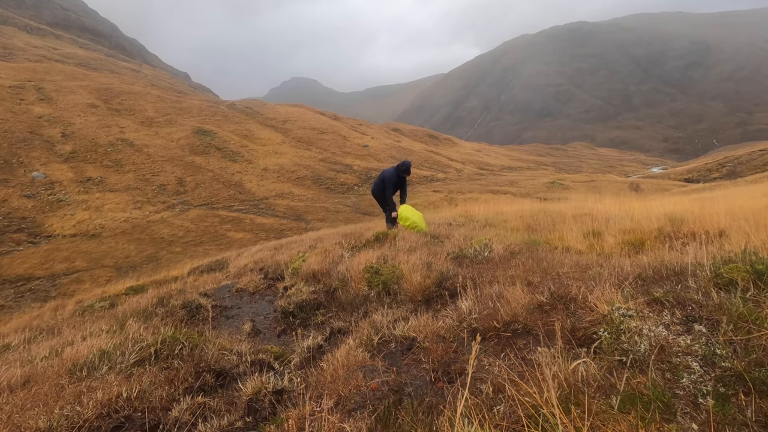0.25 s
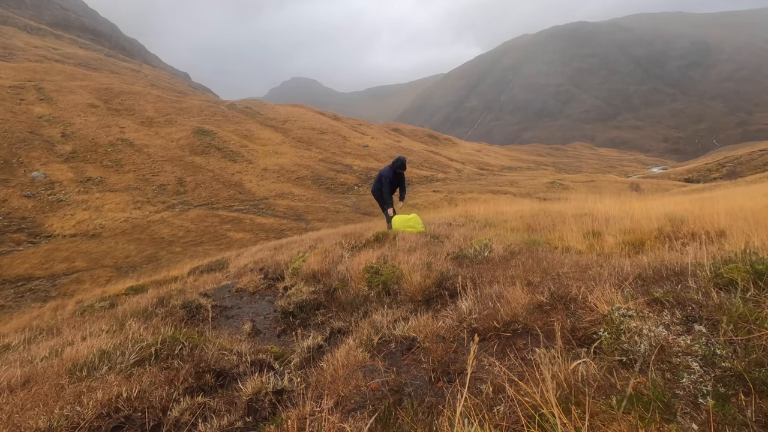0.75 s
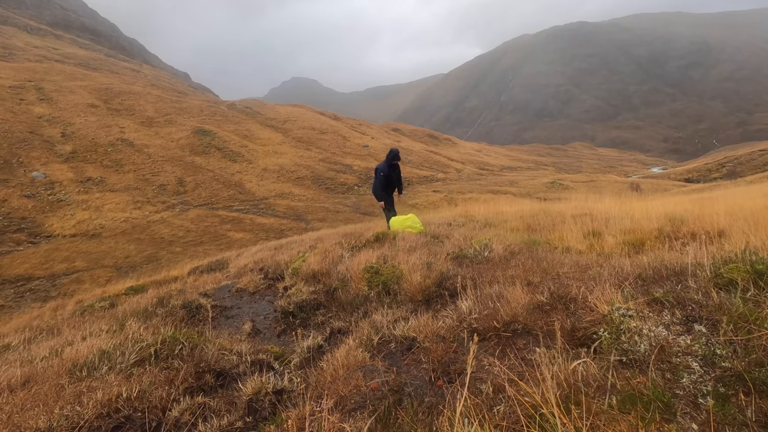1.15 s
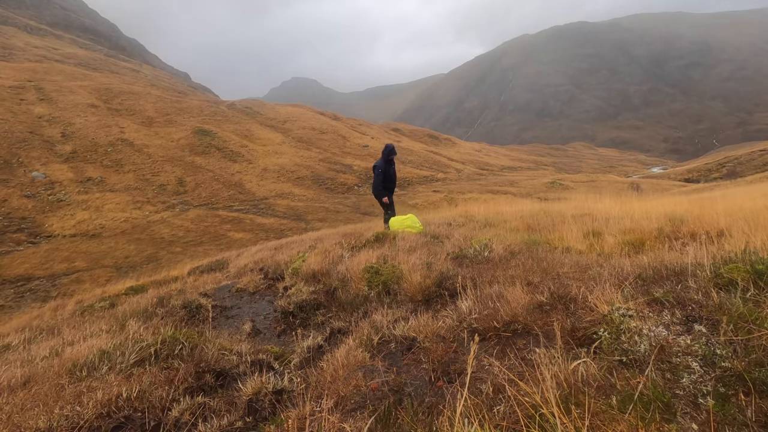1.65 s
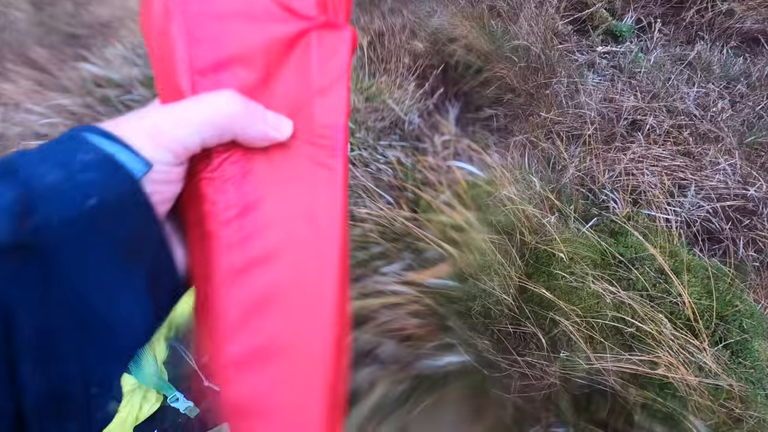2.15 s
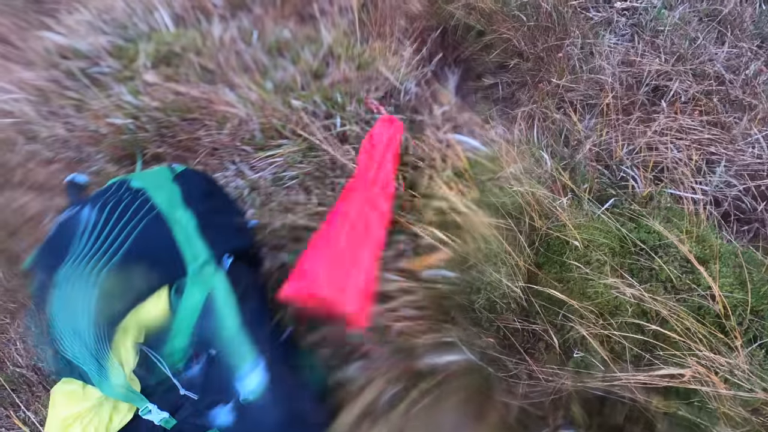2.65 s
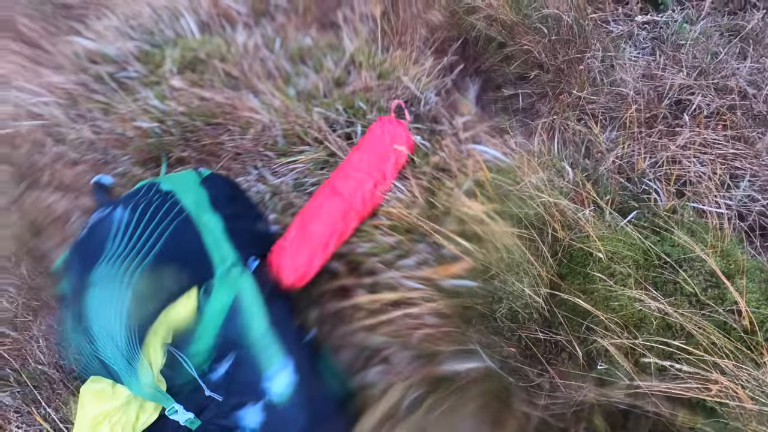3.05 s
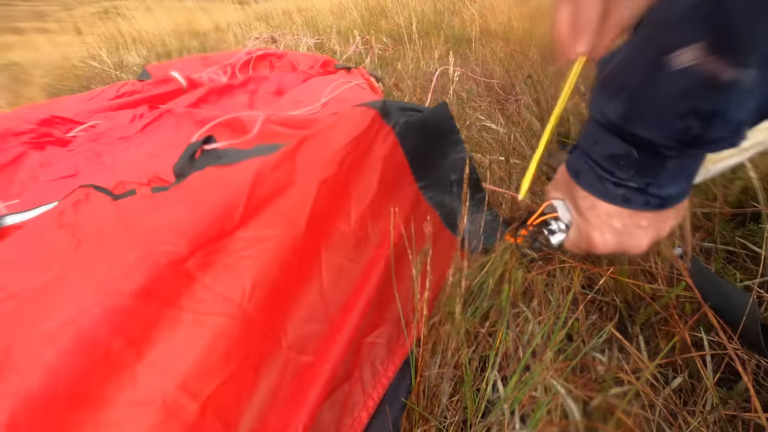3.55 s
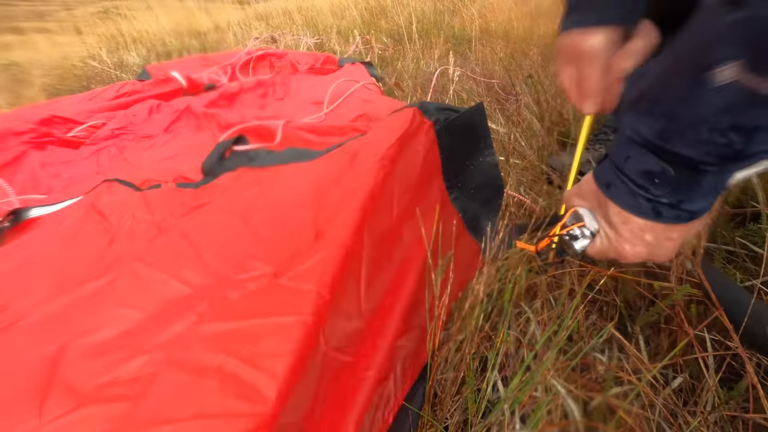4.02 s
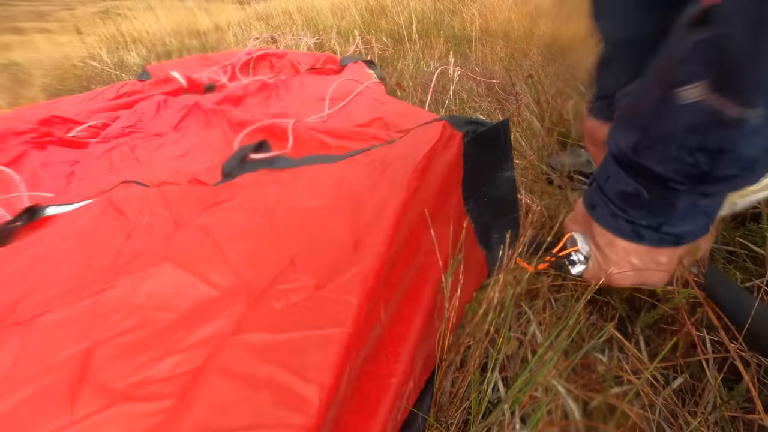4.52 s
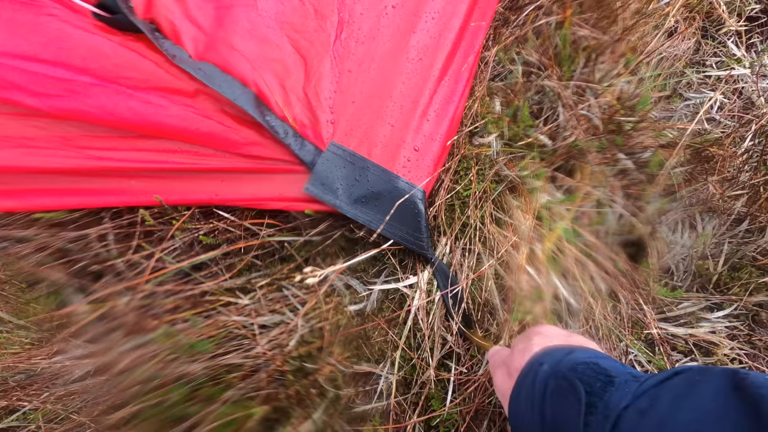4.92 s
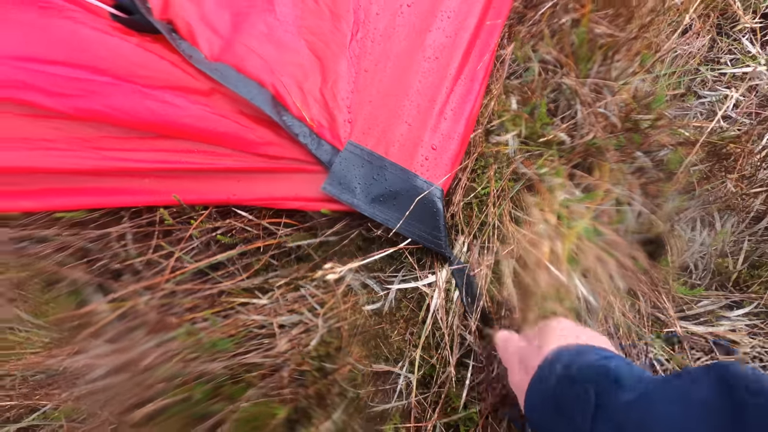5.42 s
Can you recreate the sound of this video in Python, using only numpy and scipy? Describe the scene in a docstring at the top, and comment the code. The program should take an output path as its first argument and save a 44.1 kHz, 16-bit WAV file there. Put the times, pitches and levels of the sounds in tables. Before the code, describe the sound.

Buffeting wind rumble on open grassland, a quick clattering drop of bagged tent poles, then flapping tent cloth crackling until a heavier final gust.

```python
"""Gale on a grassy hillside

Four places are heard in turn, only the third with two separate ports. Banded noise gives the wind's buffeting
and roar, the hiss of grass and the rustle of cloth; windowed sines are the thumps of large eddies.
A bag of metal tent poles is dropped: filtered noise bursts crunch and thud, and resonators ring as the poles.
Tent fabric then rustles and snaps, with short resonant bursts for the snaps and random pops for the folds.
"""
import sys
import numpy as np
from scipy import signal
from scipy.io import wavfile

SR = 44100
rng = np.random.default_rng(int(sys.argv[2]) if len(sys.argv) > 2 else 0)


def boost_factor(decibels):
    """Convert a level in decibels to a linear amplitude factor."""
    exponent = np.asarray(decibels, float) / 20
    return 10 ** exponent


def output_pcm(signal):
    """Save a mono or channel-first signal as 16-bit PCM at the path in sys.argv[1].

    Samples are clipped to [-1, 1] before scaling.
    """
    pcm = np.clip(np.atleast_2d(signal).T, -1, 1) * 32767
    wavfile.write(sys.argv[1], SR, np.round(pcm).astype(np.int16))


N = 250047  # samples

HALVES = np.array([[.5], [-.5]])  # shares a left-minus-right difference between the two channels


def rms_one(x):
    """Normalisation: scale to unit rms."""
    return x / np.sqrt(np.mean(x ** 2) + 1e-20)


def in_time(*tables):
    """Linear interpolation of table columns in time; the first, a level, is silent outside the rows."""
    s, level_db, *others = np.concatenate(tables).T
    t = np.arange(N) / SR
    return [np.interp(t, s, level_db, -120, -120)] + [np.interp(t, s, column) for column in others]


def at_hz(points, hz):
    """Interpolation of a spectrum on a log-frequency axis."""
    table_hz, table_db = np.transpose(points)
    return np.interp(np.log(hz), np.log(table_hz), table_db)


def drift(rate_hz):
    """Low-pass random process: noise at every 20th sample through two equal poles, at unit rms."""
    pole = np.exp(-40 * np.pi * rate_hz / SR)
    noise = rng.standard_normal(N // 20 + 3002)
    slow = signal.lfilter([1], [1, -2 * pole, pole * pole], noise)[3000:]  # settled part
    return np.interp(np.arange(N) / 20, np.arange(len(slow)), rms_one(slow))


def ring(clicks, hz, t60):
    """Impulse response of a damped mode: a unit click starts a decaying sine of nominal height 1."""
    r, w = boost_factor(-60 / (t60 * SR)), 2 * np.pi * hz / SR
    return signal.lfilter([0, np.sin(w)], [1, -2 * r * np.cos(w), r * r], clicks + 1e-18)


def low_pass(x, cut_hz):
    """Second-order Butterworth attenuation of the treble."""
    return signal.sosfilt(signal.butter(2, cut_hz, fs=SR, output="sos"), x)


def burst(hz, t60, width, crack):
    """Resonance excited by a crack and decaying noise, at unit peak; width is bandwidth over frequency."""
    t = np.arange(2205) / SR
    r, w = np.exp(-np.pi * width * hz / SR), 2 * np.pi * hz / SR
    noise = rng.standard_normal(len(t)) * boost_factor(-60 * t / t60)
    noise[0] = crack
    x = signal.lfilter([1, 0, -1], [1, -2 * r * np.cos(w), r * r], noise)
    return x / np.abs(x).max()


def bursts(hits, t60, width, crack):
    """Superposition of bursts at the tabulated times, peaks and centre frequencies."""
    out = np.zeros(N)
    for s, db, hz in hits:
        x, i = boost_factor(db) * burst(hz, t60, width, crack), round(s * SR)
        out[i:i + len(x)] += x
    return out


# interval during which the two ports are heard apart: start t/s, end t/s
APART_S = 3.235, 4.98


def two_ports():
    """Gate of the stereo field: 1 while the ports are heard apart, 0 while they are summed."""
    t = np.arange(N) / SR
    return (t > APART_S[0]) & (t < APART_S[1])


# sound not shared by the ports, against the shared sound: f/Hz, level/dB
PORT_UNSHARED = [(28, -4), (60, -7), (110, -14), (200, -31), (380, -12), (700, -11), (1290, -9), (2380, -8),
                 (4400, -2.5), (8120, 0.5), (15000, 3)]
# left minus right port: f/Hz, level/dB
PORT_LEAN = [(60, 10), (110, -1.5), (200, 1.5), (380, 1.5), (700, 3.5), (1290, 1), (2380, 5.5), (4400, 1),
             (8120, -2.5), (15000, 0)]


def banded(spectrum, patchy_db, patch_rate, tilt_db=0, pulse=1):
    """Subtractive synthesis: enveloped noise in about third-octave bands, each with its own level flicker."""
    low, high = spectrum[1][0], min(spectrum[-2][0], 16000)  # the end rows lie outside the bands
    edges = np.geomspace(low, high, int(np.log2(high / low) / .33) + 2)
    white = pulse * rng.standard_normal((2, 2, N))
    apart, out, power = two_ports(), 0, 0
    for k, (a, b) in enumerate(zip(edges, edges[1:])):
        hz = np.sqrt(a * b)
        band_pass = signal.butter(2, [a, b], "band", fs=SR, output="sos")
        shared, unshared = signal.sosfilt(band_pass, white[k % 2])  # neighbours use different noise
        spectrum_db = at_hz(spectrum, hz)
        octaves = np.log2(hz / np.sqrt(low * high))
        gain = boost_factor(spectrum_db + patchy_db * drift(patch_rate) + tilt_db * octaves)
        lean = np.where(apart, boost_factor(at_hz(PORT_LEAN, hz) * HALVES), 1)
        difference = apart * boost_factor(at_hz(PORT_UNSHARED, hz)) * unshared * [[1], [-1]]
        out = out + gain * lean * (shared + difference)
        power += (b - a) * boost_factor(2 * spectrum_db)
    return out / np.sqrt(power * 2 / SR * np.mean(np.square(pulse)))  # nominal unit rms, untilted


def creases(per_s, spread_db, t60, smooth):
    """Shot-noise envelope: creases let go as sudden rises that die fast, over a smooth rubbing share."""
    sizes = boost_factor(spread_db * np.minimum(rng.exponential(1, N), 5))
    born = rng.random(N) < per_s * boost_factor(3.0 * drift(12.0)) / SR
    decays = signal.lfilter([1], [1, -boost_factor(-60 / (t60 * SR))], sizes * born + 1e-18)
    return smooth + rms_one(decays)


def crinkle(per_s, low_hz, high_hz, cycles, fall_db):
    """Random modal excitation: small folds pop, each ringing a few cycles at its own pitch and side."""
    sizes = boost_factor(4 * np.minimum(rng.exponential(1, N), 4)) * rng.choice([-1, 1], N)
    born = rng.random(N) < per_s * boost_factor(3.0 * drift(10.0)) / SR
    placed = sizes * born * boost_factor(two_ports() * rng.normal(2.3, 2.5, N) * HALVES)
    pitches, dealt = np.geomspace(low_hz, high_hz, 12), rng.integers(0, 12, N)
    pops = 0
    for k, hz in enumerate(pitches):
        fall = boost_factor(-fall_db * np.log2(hz / low_hz))  # fall_db per octave
        pops = pops + fall * ring(placed * (dealt == k), hz, cycles / hz)
    high_pass = signal.butter(2, low_hz / 2, "high", fs=SR, output="sos")
    return rms_one(signal.sosfilt(high_pass, pops))


# wind before its random drift: t/s, buffeting level/dB, roar level/dB
WIND_LEVELS = [(0.0, -32.5, -32), (0.4, -35, -33), (0.95, -41, -35), (1.3, -40, -33), (1.92, -34, -33),
               (1.98, -43, -34), (2.165, -40, -36), (2.185, -35, -32), (2.43, -43, -30), (2.66, -43, -33.5),
               (3.0, -36, -34.5), (3.23, -37, -34), (4.0, -30, -33.5), (4.1, -36, -35.5),
               (4.45, -38.5, -34), (4.96, -32, -33.5), (4.99, -25, -29), (5.3, -32, -32),
               (5.52, -26.5, -31), (5.67, -31.5, -34.5)]
# relative spectral density of the buffeting: f/Hz, level/dB per Hz
BUFFET_SPECTRUM = [(11, -30), (18, -1.5), (41, 2), (66, 1), (110, -9.5), (140, -27), (240, -120)]
# relative spectral density of the roar before tilt: f/Hz, level/dB per Hz
ROAR_SPECTRUM = [(47, -30), (80, 0.5), (183, -3.5), (258, -8), (388, -13.5), (519, -18.5), (594, -30),
                 (700, -17.5), (910, -32), (1540, -120)]
# colour of the roar at each place: start t/s, brightening/dB per octave
ROAR_COLOUR = [(0, 1), (2.175, -1), (3.235, -2), (4.98, 2)]


def wind_on_ports():
    """Turbulent pressure fluctuation: large eddies buffet slowly below, small ones roar above."""
    buffet_db, roar_db = in_time(WIND_LEVELS)
    starts, tilts = np.transpose(ROAR_COLOUR)
    tilt_db = tilts[np.searchsorted(starts, np.arange(N) / SR, "right") - 1]
    buffet = banded(BUFFET_SPECTRUM, patchy_db=1.0, patch_rate=10.0)
    roar = banded(ROAR_SPECTRUM, patchy_db=1.0, patch_rate=13.4, tilt_db=tilt_db)
    return boost_factor(buffet_db + 1.23 * drift(4.4)) * buffet + boost_factor(roar_db) * roar


# grass hiss: t/s, level/dB, brightening/dB per octave
GRASS_LEVELS = [(0.0, -42.5, 1.5), (1.41, -45, 1), (2.11, -43.5, 1), (2.41, -40.5, -2), (2.68, -50, -5),
                (2.84, -42, 2.5), (3.09, -49, -2.5), (3.25, -47, -1)]
# relative spectral density of the hiss before tilt: f/Hz, level/dB per Hz
GRASS_SPECTRUM = [(290, -30), (500, -3), (602, -10), (836, -10.5), (911, -6.5), (1780, -9.5), (2550, -15.5),
                  (2820, -16), (4080, -19), (7340, -38.5), (8460, -35.5), (12800, -55), (15200, -72)]


def grass():
    """Incoherent summation: many far blades rubbing make a smooth hiss."""
    level_db, tilt_db = in_time(GRASS_LEVELS)
    return boost_factor(level_db) * banded(GRASS_SPECTRUM, patchy_db=0.58, patch_rate=10.0, tilt_db=tilt_db)


# big eddies, before the lean between ports: centre t/s, swell peak level/dB, f/Hz
EDDIES = [(0.039, -21.5, 45.4), (0.169, -22, 50), (0.78, -25, 45), (1.11, -27, 40), (1.259, -21, 45),
          (1.561, -18.5, 45), (1.87, -25, 33), (2.35, -23, 55), (3.12, -22, 35), (3.295, -18, 45),
          (3.81, -21, 30), (3.99, -22.5, 50), (4.19, -25.5, 35), (4.571, -20.5, 28), (5.02, -14.5, 35),
          (5.182, -11, 38), (5.26, -19, 23.05), (5.401, -16.5, 35), (5.54, -18.5, 62)]


def thumps():
    """Gaussian-windowed oscillation: each big eddy pushes and pulls for about one cycle."""
    width_cycles, left_db, lag_rad = 0.3, 6.0, 0.9  # lean and phase lag act while the ports are apart
    t, out, apart = np.arange(N) / SR, np.zeros((2, N)), two_ports()
    phases = rng.uniform(0, 2 * np.pi, len(EDDIES))
    for (s, db, hz), phase in zip(EDDIES, phases):
        near = slice(max(round((s - 2 / hz) * SR), 0), round((s + 2 / hz) * SR))
        cycles = (t[near] - s) * hz
        ports = apart[near] * HALVES
        swell = boost_factor(db + left_db * ports) * np.exp(-.5 * (cycles / width_cycles) ** 2)
        out[:, near] += swell * np.sin(2 * np.pi * cycles + phase + lag_rad * ports)
    return out


# three moves of the bag, one list each, before the layer gains: t/s, relative rustle level/dB
BAG_MOVES = [
    [(2.2, -55), (2.31, -39), (2.32, -32), (2.39, -40), (2.398, -28), (2.496, -57), (2.55, -45)],
    [(2.56, -45), (2.602, -28), (2.62, -11), (2.678, -19), (2.712, -33), (2.768, -30), (2.784, -37),
     (2.86, -45)],
    [(2.87, -47), (2.956, -15.5), (3.006, -30), (3.016, -22.5), (3.042, -32.5), (3.136, -45), (3.144, -58),
     (3.2, -52)],
]
# relative spectral density of bag cloth before tilt: f/Hz, level/dB per Hz
BAG_SPECTRUM = [(350, -45), (600, -8), (1090, -4.5), (1380, -8), (1690, -3.5), (3160, -5), (3570, 0.5),
                (4820, 0), (8090, -12.5), (9660, -23), (12200, -13.5), (15600, -45)]


def bag_rustle():
    """Stick-slip friction: bag cloth rustles as many small, crisp creases and pops."""
    level_db, = in_time(*BAG_MOVES)
    envelope = creases(900., 3.3, 0.0082, smooth=0.79)
    rub = banded(BAG_SPECTRUM, patchy_db=2.9, patch_rate=39.0, tilt_db=0.3, pulse=envelope)
    folds = crinkle(600., low_hz=2210, high_hz=8400, cycles=7.3, fall_db=1.5)
    return boost_factor(level_db) * (boost_factor(-8) * rub + boost_factor(-14.0) * folds)


# bag cloth crunching under the poles, before softening: t/s, peak level/dB, centre f/Hz
CRUNCHES = [(2.2757, -27, 2490), (2.3176, -34, 3820), (2.3983, -20, 3610), (2.4044, -26, 2440),
            (2.435, -33, 2030), (2.613, -22, 3590), (2.6227, -12, 4680), (2.6345, -8, 4870),
            (2.649, -10, 5540), (2.67, -13, 4530), (2.7024, -25, 4650), (2.7436, -29, 3560),
            (2.7656, -32, 4700), (2.807, -27, 2450), (2.8917, -24.5, 2480), (2.907, -28, 4700),
            (2.9507, -4.5, 4800), (2.9537, -18, 3590), (2.9684, -9.5, 3730), (2.9844, -16, 4230),
            (3.017, -14.5, 4190), (3.0265, -18.5, 3540), (3.057, -33, 5120), (3.0724, -31, 5060),
            (3.101, -22.5, 4730), (3.1195, -28, 2500), (3.131, -37, 4600)]


def bag_crunch():
    """Impulsive excitation: each shift of the poles crushes the cloth in a short, soft burst."""
    return low_pass(bursts(CRUNCHES, t60=0.03, width=0.93, crack=4.0), 9000)


# pole on pole: t/s, level/dB, f/Hz of the mode struck hardest, fall-off away from it/dB per octave
POLE_HITS = [(2.316, -31.5, 3600, 18), (2.398, -32, 3600, 10), (2.613, -30, 3600, 12),
             (2.62, -23, 8150, 14), (2.624, -25, 1110, 25), (2.670, -28, 2444, 12), (2.702, -35, 4690, 14),
             (2.742, -30, 3600, 21), (2.751, -33, 2444, 27), (2.767, -36, 4690, 17), (2.805, -41, 7850, 4),
             (2.909, -33, 4690, 20), (2.954, -21, 3600, 16), (2.968, -28, 3600, 8), (3.016, -31, 3600, 9),
             (3.061, -35, 4690, 18), (3.132, -36.5, 4690, 22)]
# modes of the poles: f/Hz, relative level/dB, t60/s
MODES = [(1110, 3.5, 0.074), (2444, 0, 0.087), (3600, 3.5, 0.044), (4690, 3, 0.026), (6570, -22, .05),
         (7850, -2, 0.058), (8150, 1.5, 0.052), (8700, -13, .06), (10800, -8, .07)]


def pole_clinks():
    """Modal synthesis: each clink rings the pole modes, favouring those near its contact colour."""
    s, level_db, centre_hz, fall_db = np.transpose(POLE_HITS)
    chance_db = rng.normal(0, 3.6, (len(s), len(MODES)))
    out = np.zeros(N)
    for k, (hz, mode_db, t60) in enumerate(MODES):
        clicks = np.zeros(N)
        far_db = fall_db * np.abs(np.log2(hz / centre_hz))
        clicks[np.round(s * SR).astype(int)] = boost_factor(level_db + mode_db + chance_db[:, k] - far_db)
        out += ring(clicks, hz, t60)
    return out


# the bag bumps the ground, before softening: t/s, peak level/dB, centre f/Hz
GROUND_HITS = [(2.327, -27, 700), (2.618, -19, 550), (2.951, -26, 700)]


def bag_thuds():
    """Damped impact: the loaded bag meets the turf with a dull, broad push."""
    return low_pass(bursts(GROUND_HITS, t60=0.07, width=1.3, crack=2.5), 1600)


# flapping of the tent, before drift and layer gains: t/s, relative rustle level/dB
TENT_FLAPPING = [(3.24, -40.5), (3.32, -36), (3.66, -36), (3.76, -42.5), (3.8, -35), (3.92, -40.5),
                 (3.95, -38.5), (4.03, -43), (4.08, -40.5), (4.47, -40), (4.6, -43), (4.63, -40),
                 (4.975, -38.5), (5.185, -43), (5.285, -39), (5.45, -37.5), (5.58, -42.5), (5.67, -42)]
# relative spectral density of tent cloth before tilt: f/Hz, level/dB per Hz
TENT_SPECTRUM = [(290, -36), (500, -6), (569, -12), (612, 2), (851, -3), (955, 3), (2140, -1.5),
                 (3020, -4.5), (7690, -19), (12400, -31), (15600, -50)]


def tent_rustle():
    """Stick-slip friction: flapping tent cloth rubs more smoothly, with sparser creases and pops."""
    level_db, = in_time(TENT_FLAPPING)
    envelope = creases(200., 2.2, 0.0021, smooth=2.2)
    rub = banded(TENT_SPECTRUM, patchy_db=1.55, patch_rate=26.0, tilt_db=0.2, pulse=envelope)
    folds = crinkle(250., low_hz=1120, high_hz=7500, cycles=6.5, fall_db=1.0)
    return boost_factor(level_db + 1.45 * drift(7.0)) * (boost_factor(-2.5) * rub + boost_factor(-7.5) * folds)


def flicks():
    """Random point process: small snaps at chance moments, their level following the flapping."""
    per_s, above_db, spread_db = 60., 9, 4.0  # levels over the tabulated flapping
    low_hz, high_hz, side_db = 1700, 5000, 6.5
    flap_db, = in_time(TENT_FLAPPING)
    start, span = TENT_FLAPPING[0][0], TENT_FLAPPING[-1][0] - TENT_FLAPPING[0][0]
    when, loud, pitch, side = rng.random((int(per_s * span), 4)).T
    i = ((start + span * when) * SR).astype(int).clip(0, N - 1)
    db = flap_db[i] + above_db + spread_db * (2 * loud - 1)
    hz = low_hz * (high_hz / low_hz) ** pitch
    # one-sided lean, in the same columns as the snaps
    return np.transpose([i / SR, db, hz, 2 * side * side_db * two_ports()[i]])


# loudest tent snaps, before tick and softening: t/s, peak level/dB, centre f/Hz, left minus right level/dB
LOUD_SNAPS = [(3.2932, -22, 1780, -1), (3.334, -19, 1550, -4), (3.3995, -25, 1510, 2.5),
              (3.4229, -17, 2390, 2.0), (3.4685, -25, 1770, 1), (3.4826, -16, 1820, 1),
              (3.5427, -23, 2080, 0), (3.628, -19, 1230, 0), (3.6657, -18, 1220, 1),
              (3.7806, -24, 2380, 3.0), (3.794, -26, 1310, 1), (3.815, -19, 3640, 3.5),
              (3.8295, -17.5, 1730, 3.5), (3.8544, -17.5, 2000, 5), (3.885, -22.5, 1220, 3),
              (3.9392, -26, 2150, 3.0), (4.065, -21, 2320, 1.5), (4.1215, -21, 2170, 7),
              (4.1398, -20, 2160, 3.0), (4.1732, -23, 1630, 5.0), (4.242, -22, 1340, 2.0),
              (4.3294, -23, 1530, 4.0), (4.472, -18, 1780, 6), (4.527, -23, 1320, 4.0),
              (4.624, -16.5, 1490, 3), (4.8266, -22, 2150, 2.5), (4.8921, -13.5, 1820, 9),
              (5.0027, -23, 1530, 0.0), (5.0447, -22, 1550, 0.5), (5.0623, -18, 1450, 0.0),
              (5.394, -18, 1510, 0.0), (5.483, -24, 1720, 0.5), (5.5039, -24, 1280, 0.5),
              (5.6548, -26, 1480, 0.5)]


def tent_snaps():
    """Impulsive release of tension: cloth flicks at its own pitch with a bright tick, between the ports."""
    out, crack = np.zeros((2, N + SR)), 6.0
    for s, db, hz, pan_db in [*LOUD_SNAPS, *flicks()]:
        body = burst(hz, 0.017, 0.56, crack)
        tick = boost_factor(-7) * burst(4500, 0.0043, 0.88, crack)
        x, i = body - tick, round(s * SR)
        out[:, i:i + len(x)] += boost_factor(db) * x * boost_factor(pan_db * HALVES)
    return low_pass(out[:, :N], 6600)


def scene():
    """Linear superposition of all sources at the microphone."""
    weather = wind_on_ports() + grass() + thumps()
    bag = bag_rustle() + bag_crunch() + pole_clinks() + bag_thuds()
    tent = tent_rustle() + tent_snaps()
    return weather + bag + tent


def top_cut(x):
    """Nothing passes above the cut-off."""
    return signal.sosfilt(signal.butter(12, 15710, fs=SR, output="sos"), x)


def record(dry):
    """Low-pass filtering: the microphone housing dulls the top."""
    dull = low_pass(dry, 10100)
    return top_cut(dull)


dry = scene()
out = record(dry)
output_pcm(out)
```